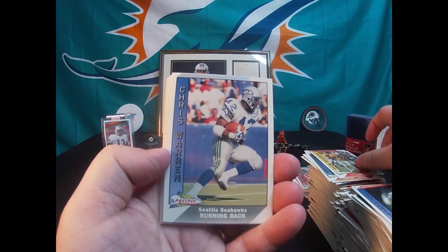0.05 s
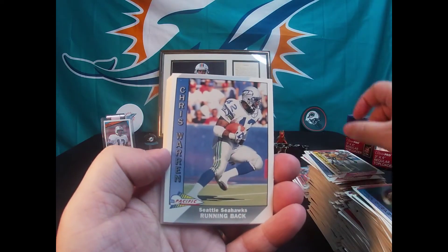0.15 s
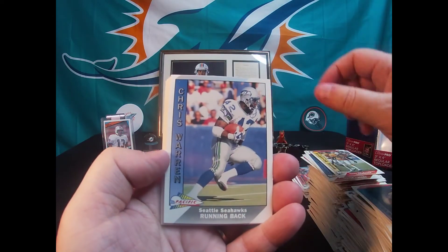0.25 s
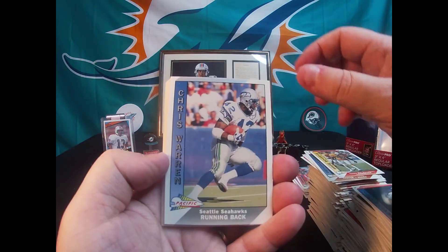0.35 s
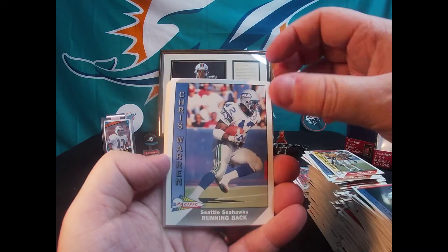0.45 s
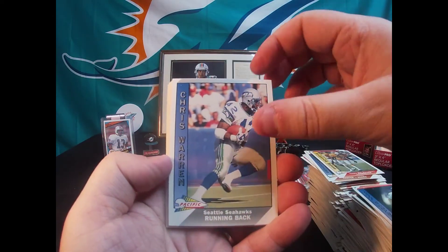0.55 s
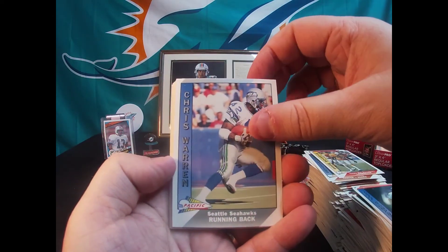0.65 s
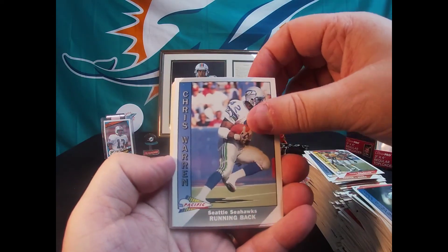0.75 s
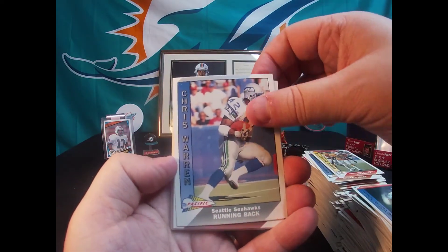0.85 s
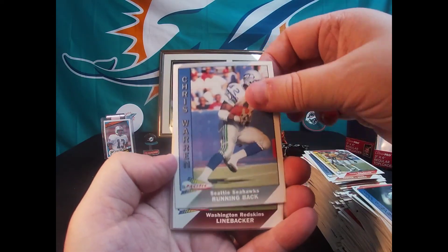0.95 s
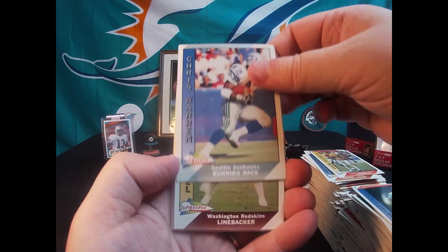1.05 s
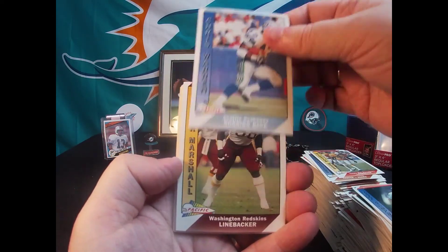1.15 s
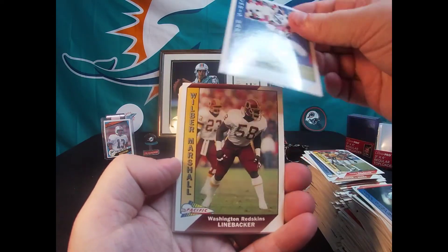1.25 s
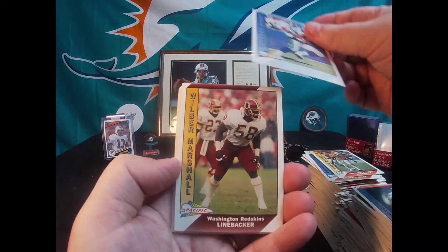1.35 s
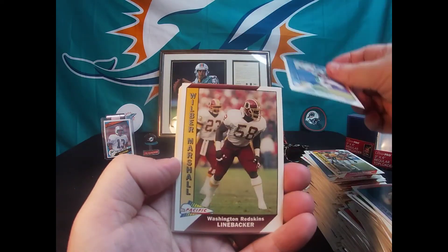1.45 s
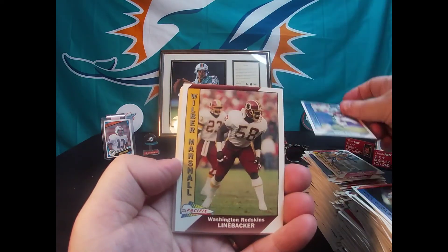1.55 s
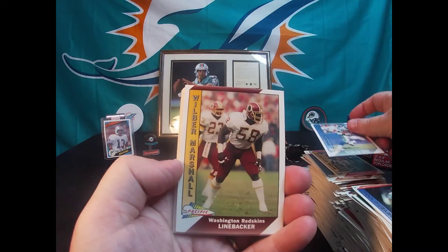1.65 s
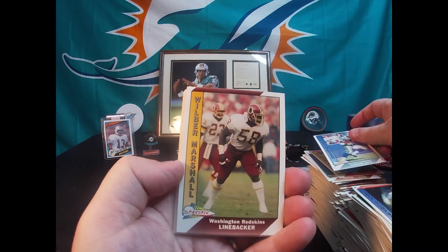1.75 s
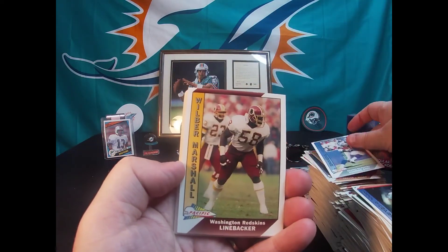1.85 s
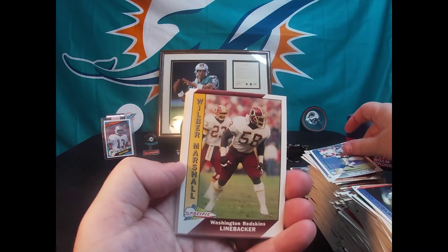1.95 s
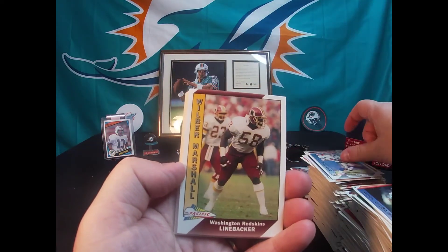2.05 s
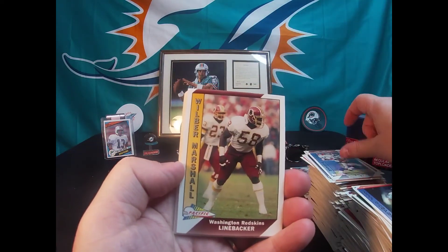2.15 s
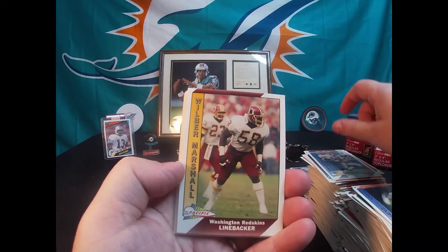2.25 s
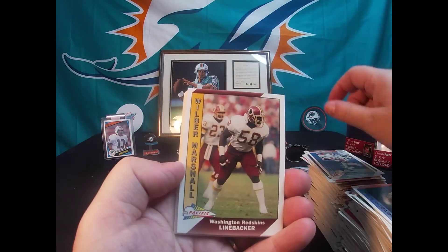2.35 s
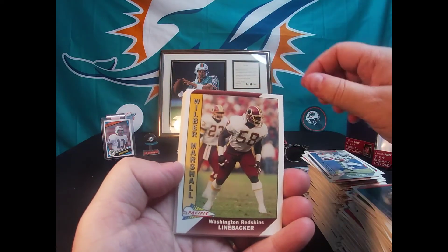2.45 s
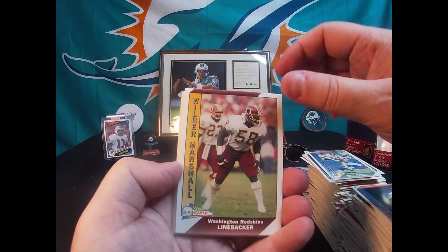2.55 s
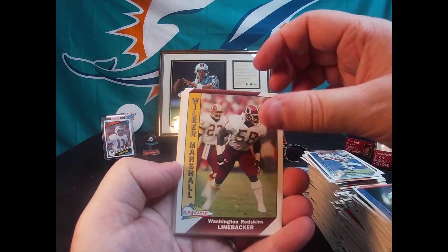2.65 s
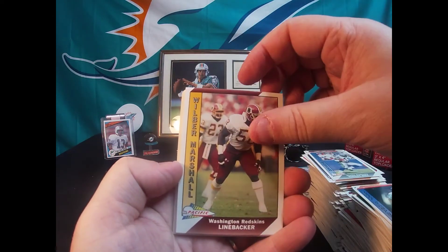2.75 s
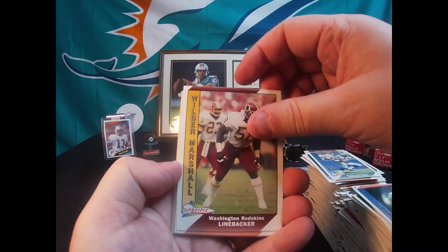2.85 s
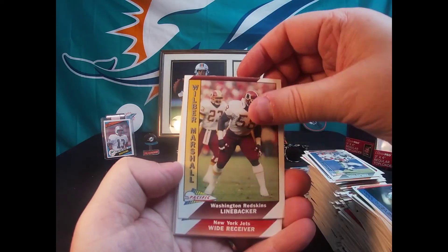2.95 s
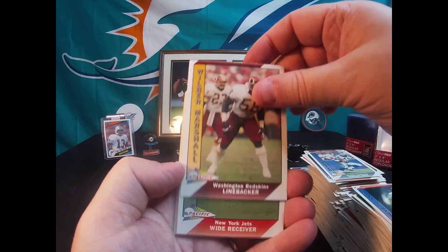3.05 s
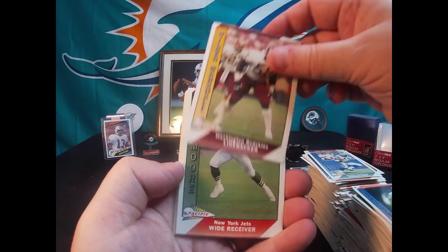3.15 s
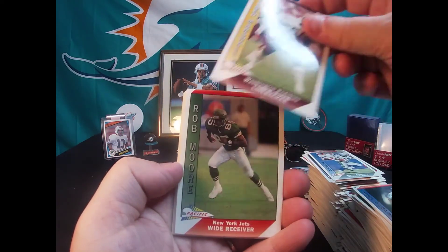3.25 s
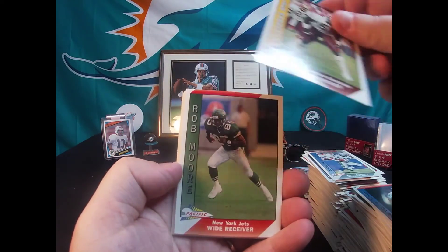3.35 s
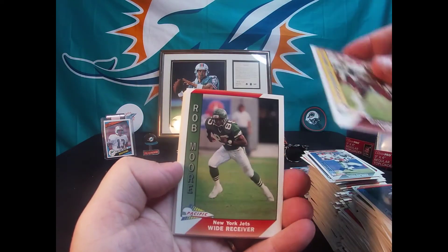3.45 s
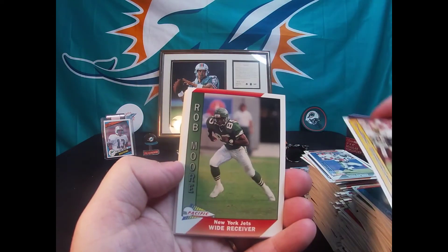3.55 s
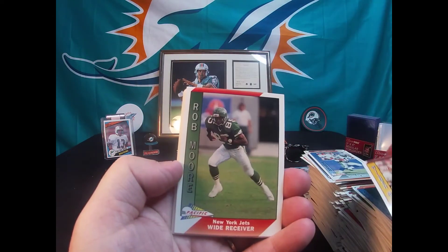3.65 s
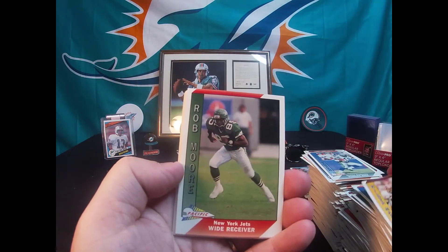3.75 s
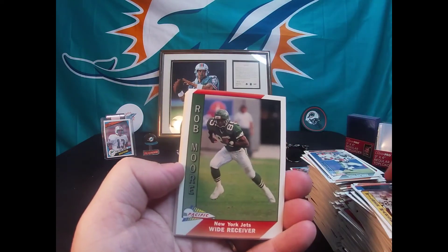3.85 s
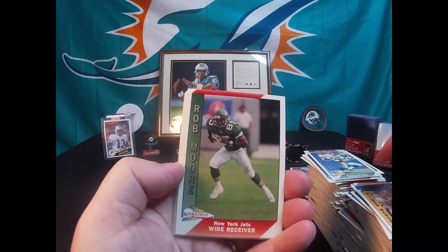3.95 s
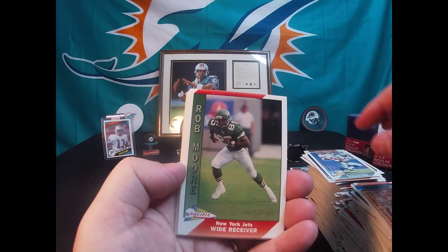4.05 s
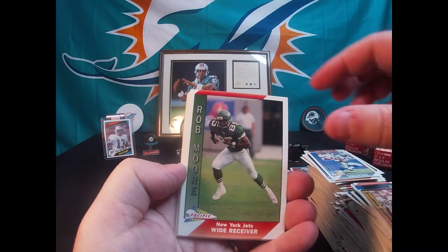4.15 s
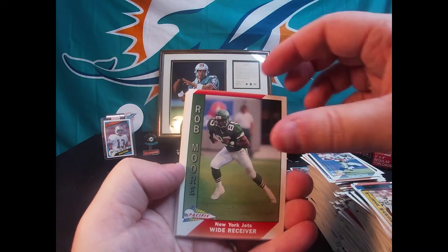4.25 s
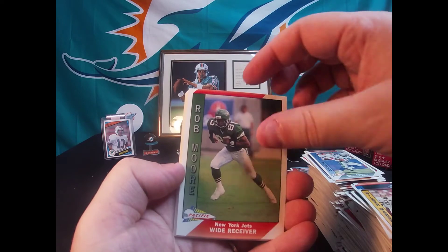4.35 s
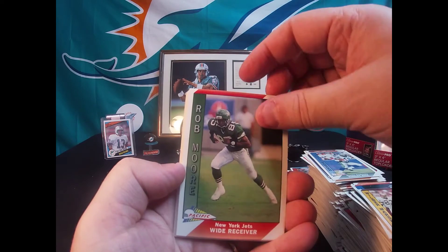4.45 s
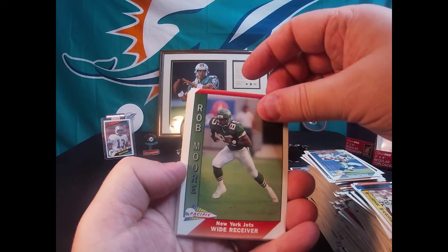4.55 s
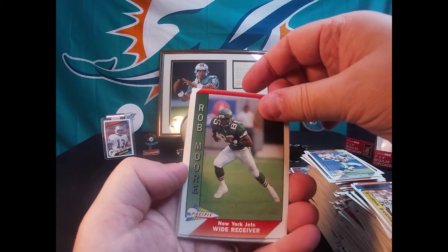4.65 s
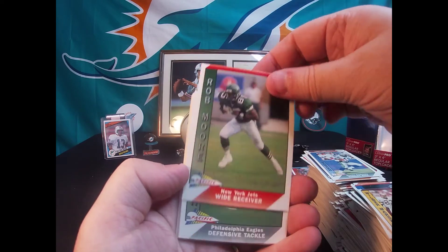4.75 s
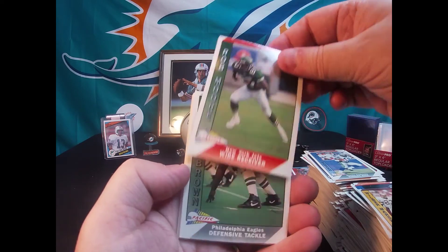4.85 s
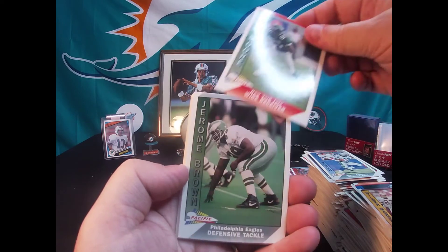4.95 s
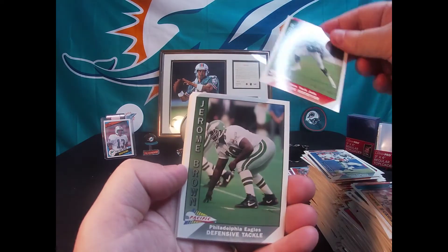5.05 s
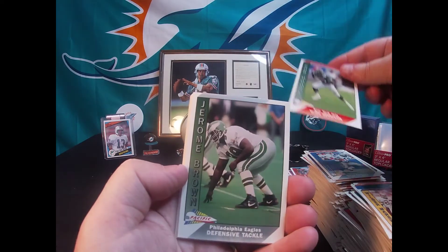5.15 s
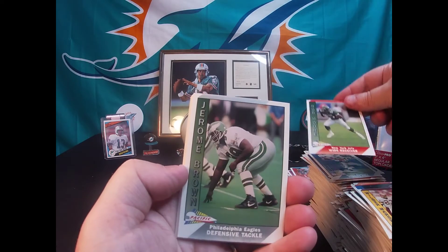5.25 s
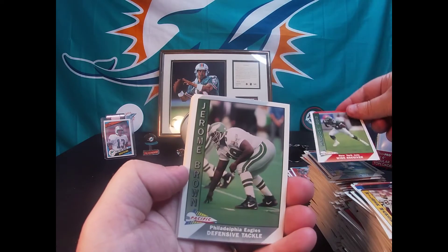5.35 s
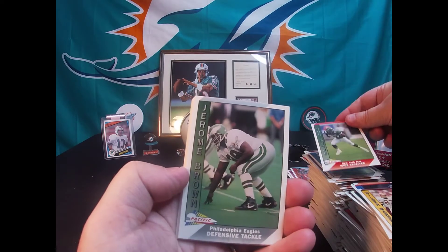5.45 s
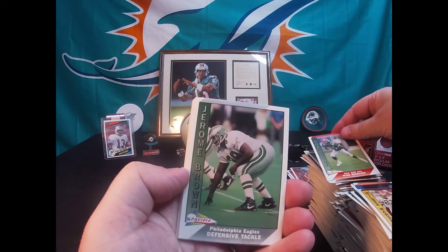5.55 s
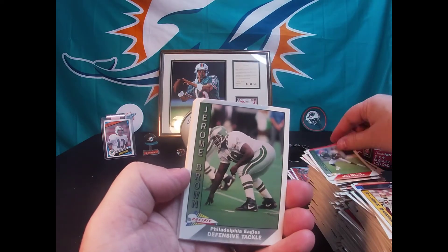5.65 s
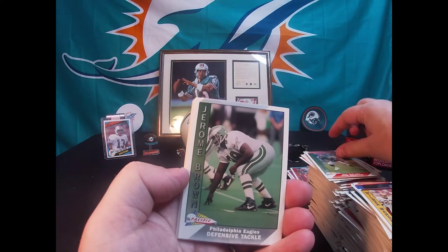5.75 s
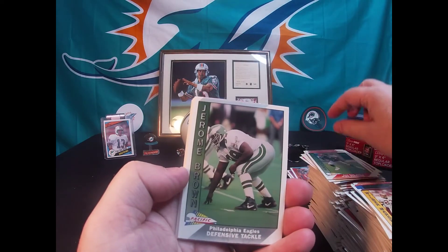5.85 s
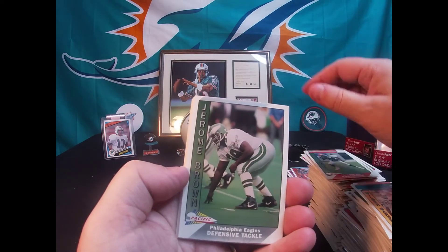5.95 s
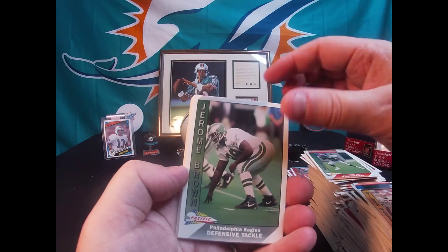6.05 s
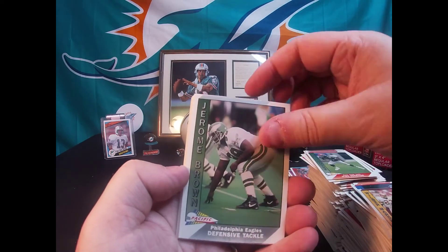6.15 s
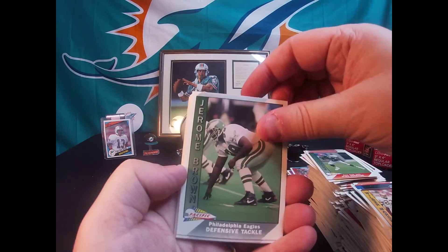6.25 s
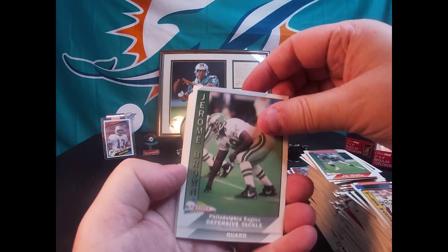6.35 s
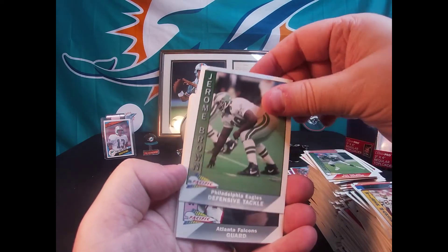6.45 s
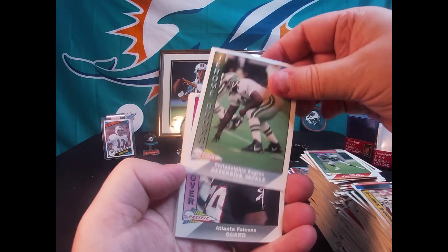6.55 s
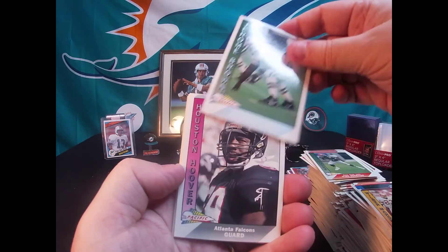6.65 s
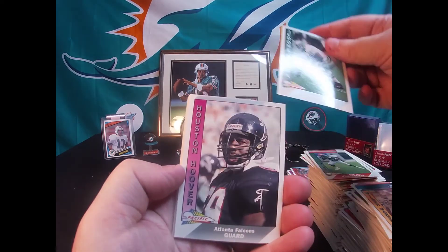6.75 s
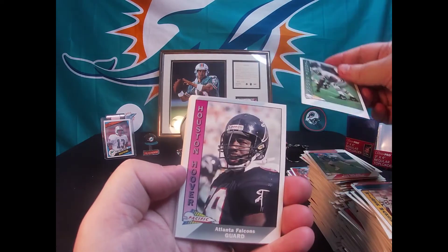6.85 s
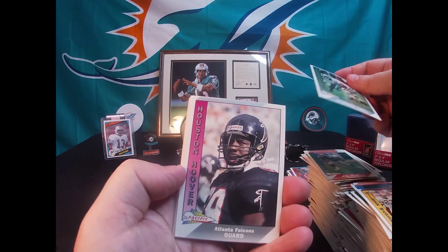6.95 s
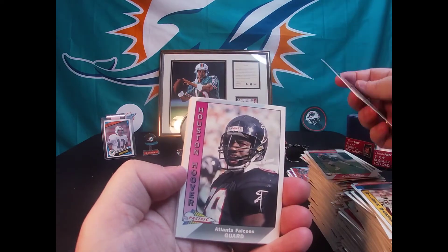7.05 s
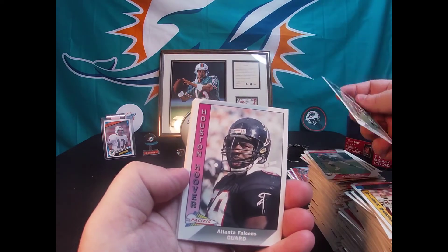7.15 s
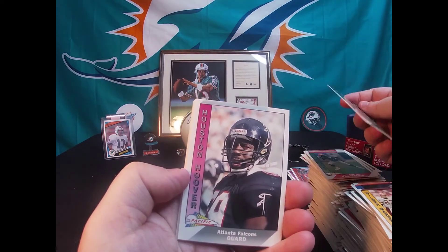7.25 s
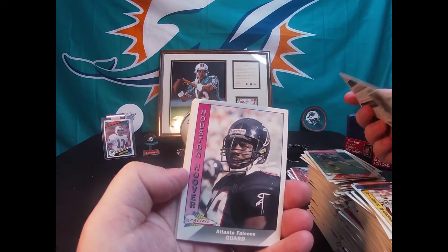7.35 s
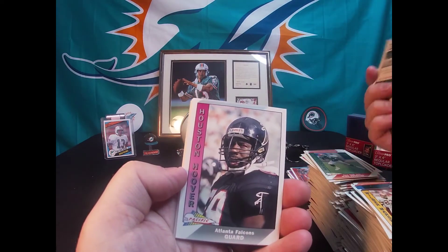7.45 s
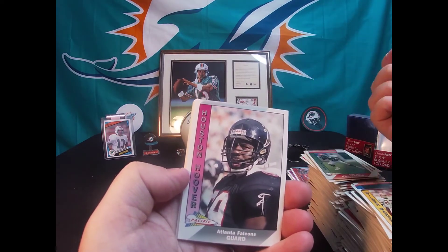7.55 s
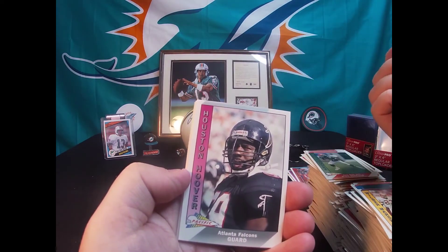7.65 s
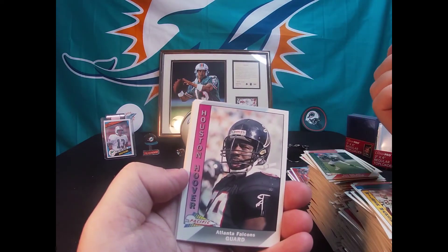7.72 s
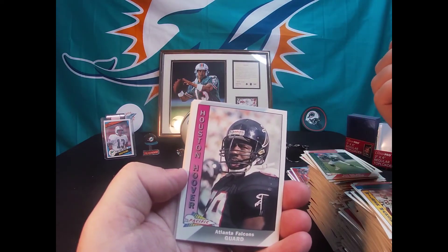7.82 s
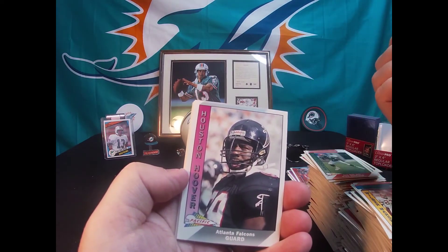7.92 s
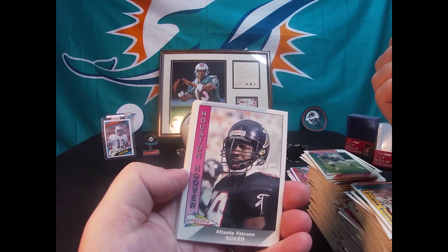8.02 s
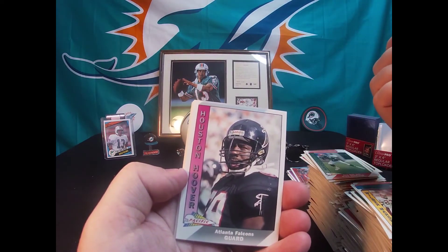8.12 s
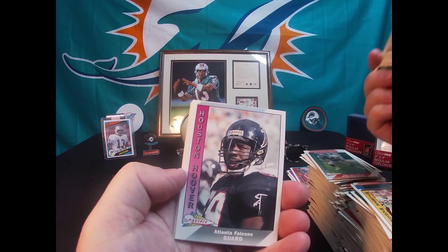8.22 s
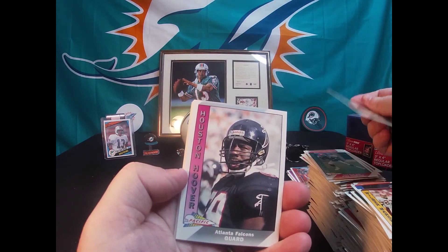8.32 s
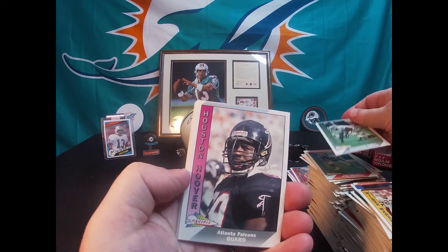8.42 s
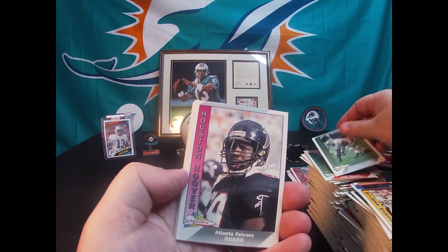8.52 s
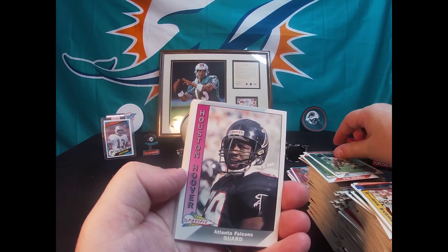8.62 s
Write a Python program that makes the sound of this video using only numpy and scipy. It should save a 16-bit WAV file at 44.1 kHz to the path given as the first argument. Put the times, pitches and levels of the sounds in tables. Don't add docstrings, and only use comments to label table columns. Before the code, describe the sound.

A steady, dull fan hum lies under intimate card handling at a desk. A sharp slap opens, then gritty, swelling slips alternate with snappy landings about every two seconds, the third among the loudest with a strong skim. Light brushes, tiny clicks and cloth rustle come between; the last seconds hold only loose brushing, ticks and a faint thump. Close single microphone, small dry room.

```python
import sys
import numpy as np
from scipy import signal
from scipy.fft import rfft, irfft
from scipy.io import wavfile
from scipy.ndimage import uniform_filter1d

SR = 44100
rng = np.random.default_rng(int(sys.argv[2]) if len(sys.argv) > 2 else 0)


def materialize(psi):
    bounded = np.clip(np.atleast_2d(psi).T, -1, 1)
    quanta = np.round(bounded * 32767).astype(np.int16)
    wavfile.write(sys.argv[1], SR, quanta)


def linear_from_db(decibels):
    return 10 ** (np.asarray(decibels, float) / 20)


N = 382788

# (frequency [Hz], level [dB per Hz])
FAN_AIR = [(41, -35), (70, -10), (98, -11), (123, -10.5), (161, 1), (206, -1.5), (288, -7), (345, -15.5),
           (661, -17), (866, -5.5), (969, -12), (1330, -10), (2270, -23.5), (5970, -25.5), (15000, -40.5)]
# (frequency [Hz], width [Hz], lift over the air noise [dB])
FAN_CASE = [(170, 45, 2), (208.9, 12, 6), (782, 69, 6), (876, 51, -5), (1500, 24, 3)]
# (frequency [Hz], width [Hz], level [dB])
CASE_TONES = [(875, 50, -76), (1500, 34, -83.5)]
# (frequency [Hz], gain [dB])
CAPSULE = [(20, 2.5), (6900, 1.5), (7600, -2), (9000, -0.5), (10000, -7.5), (11000, -16), (14500, -22),
           (16000, -36.5)]
# (time [s], sleeve rustle [dB])
ARM_MOVES = [(0.0, -70), (0.39, -78.5), (0.72, -74.5), (1.5, -78.5), (2.05, -69), (2.83, -77.5),
             (3.29, -59.5), (4.11, -73), (4.83, -69.5), (5.51, -77), (5.92, -63.5), (6.36, -71),
             (7.23, -72.5), (7.71, -68.5), (8.0, -74.5), (8.68, -67)]
# (slap time [s], skim level [dB], skim rise [s], settling level [dB], bend [dB])
LANDINGS = [
    (0.074, -62.5, 0.081, -55, 2),
    (2.115, -58.5, 0.079, -62.5, -1.5),
    (3.904, -51, 0.13, -58, 0.5),
    (5.757, -59, 0.13, -52, -5.5),
]
# (start [s], length [s], first level [dB], last level [dB], bend [dB])
DRAWS = [(0.883, 0.094, -67.5, -73.5, -1.5), (0.997, 0.059, -63.5, -60, 0), (1.042, 0.2, -57.5, -57, -2),
         (1.256, 0.047, -53, -55.5, -0.5), (1.302, 0.14, -65.5, -64, -5), (2.958, 0.099, -68, -60, -1),
         (3.052, .14, -67, -54.5, 0), (3.187, 0.11, -66.5, -50, 2.5), (4.692, 0.13, -75.5, -69, -2.5),
         (5.675, 0.043, -66, -64, -3), (4.792, 0.057, -53.5, -52.5, -1), (4.86, 0.056, -55, -54.5, 2),
         (4.918, 0.049, -54, -43.5, 1.5), (5.019, 0.04, -39, -40.5, -2), (5.057, 0.043, -49, -52.5, 5),
         (6.356, .085, -74.5, -71, 1), (6.45, .11, -51, -72.5, 0.5), (6.547, 0.14, -69, -50.5, 2.5),
         (6.7, .055, -52.5, -60.5, 7), (6.744, 0.072, -53.5, -59.5, 7)]
# (peak time [s], level [dB], rise [s], fall [s], bend [dB])
BRUSHES = [(1.487, -70.5, 0.022, 0.067, -12), (3.378, -63, 0.029, 0.12, 0), (1.361, -68, .03, 0.039, 12),
           (4.985, -72.5, .03, 0.066, 18.5), (4.487, -71, .01, .1, -6.5), (3.445, -67, .06, 0.018, -7),
           (3.479, -55, 0.0056, 0.074, -2.5), (3.515, -63.5, 0.072, 0.033, 6.5),
           (3.585, -60, 0.042, 0.08, -11), (3.701, -71.5, 0.018, 0.2, -9.5), (4.538, -68, .08, .08, -8),
           (5.15, -69, 0.027, 0.082, 2), (5.204, -62.5, 0.011, 0.11, 3), (5.587, -64, .008, 0.12, -3),
           (6.908, -62.5, 0.075, 0.031, 6), (6.988, -74.5, 0.033, 0.049, 9), (7.112, -63, 0.017, 0.13, 0.5),
           (7.392, -71, .012, 0.099, 4), (7.492, -65.5, 0.092, 0.11, -4), (7.537, -60, 0.056, 0.084, 3),
           (8.222, -74, 0.0085, 0.37, 2.5), (8.34, -55, 0.042, 0.1, -4.5), (8.41, -78.5, 0.061, .1, 10),
           (8.661, -60, 0.043, 0.054, 5)]
# (low edge [Hz], high edge [Hz], level [dB], gain per dB of bend [dB])
CARD_RANGES = [(4420, 7170, -0.16, 0), (2510, 4500, -3, 0.58), (7400, 15500, -4.5, -.3),
               (1400, 2640, -6, 1.44), (646, 1320, -14.5, 1.53)]
# (time [s], peak level [dB], centre [Hz], rise and fall [ms], knock of the pile [dB])
SLAPS = [(0.0729, -9, 2870, 1.16, -36.5), (0.0776, -29, 6500, 2.6, -59), (1.289, -30, 5250, 0.52, -41.5),
         (1.3004, -38, 2980, 1.5, -50), (2.116, -24, 4170, 1.8, -32), (2.1217, -34, 2880, 0.82, -38),
         (3.903, -8.5, 2900, 1.84, -18.5), (3.9116, -23, 4390, 0.78, -27), (3.9221, -29, 3780, 1.3, -41),
         (5.005, -16, 5270, 3.3, -51), (5.7568, -14.5, 6360, 0.92, -30), (5.7612, -25, 3250, 1.65, -33.5),
         (8.618, -33, 2700, 1.25, -40), (3.9077, -21, 5380, 0.9, -42)]
# (time [s], peak level [dB], centre [Hz], knock of the pile [dB])
TICKS = [(0.997, -50, 4260, -71), (1.6077, -49, 2030, -96), (1.954, -51, 1500, -53),
         (2.0294, -49, 1500, -59), (2.0614, -44.5, 5100, -54), (2.097, -49, 4270, -67),
         (2.8608, -54, 4800, -58), (3.472, -38, 1970, -46.5), (3.5038, -38, 2250, -46),
         (3.7641, -44.5, 4020, -49), (3.8006, -48, 1510, -71), (3.863, -47, 3160, -58),
         (4.789, -52, 5800, -74), (5.1094, -47, 3310, -44), (5.199, -52, 2680, -70),
         (5.5837, -40, 1970, -62), (5.6707, -48, 5400, -55.5), (6.27, -53, 1500, -62),
         (6.4236, -53, 1500, -74), (6.4476, -46, 6700, -61), (6.8157, -40.5, 5440, -40),
         (6.8564, -41.5, 3750, -65), (6.886, -44, 2240, -53), (6.9006, -38, 2960, -54),
         (7.143, -40, 2540, -67), (7.391, -59, 1840, -68), (7.5194, -45, 5970, -64),
         (7.5436, -37.5, 2750, -60), (7.9995, -50, 5540, -84), (4.031, -55, 7530, -81)]
# (frequency [Hz], level [dB], decay time t60 [s])
PILE_MODES = [(182.4, 3.5, 0.03), (229.4, -10, 0.076), (329.6, -7, .03), (444, -5.5, 0.01),
              (748, 1.5, 0.013), (960, -10, 0.0062), (1430, -9.5, 0.013)]
# (time [s], level [dB])
THUMPS = [
    (0.091, -34),
    (2.13, -33.5),
    (3.917, -33.5),
    (5.777, -33.5),
    (8.63, -47),
]
# (frequency [Hz], level [dB], decay time t60 [s])
DESK_MODES = [(38, -13.5, 0.37), (62, -5, 0.21)]


def unit(x):
    return x / np.sqrt(np.mean(x ** 2))


def band(x, lo_hz, hi_hz, order=2):
    sos = signal.butter(order, [lo_hz, min(hi_hz, 0.45 * SR)], "band", fs=SR, output="sos")
    return signal.sosfilt(sos, x)


def ring(x, modes):
    out = 0
    for hz, db, t60 in modes:
        pole = np.exp(2j * np.pi * hz / SR - np.log(1000) / (t60 * SR))
        out = out + linear_from_db(db) * signal.lfilter([0, pole.imag], [1, -2 * pole.real, abs(pole) ** 2], x)
    return out


def walk(rate_hz):
    hold = int(SR / rate_hz)
    levels = np.repeat(rng.standard_normal(N // hold + 1), hold)
    return 0.78 * uniform_filter1d(uniform_filter1d(levels, hold), hold)[:N]


def curve_db(points):
    hz, db = np.transpose(points)
    bins_hz = np.fft.rfftfreq(N, 1 / SR)
    return np.interp(np.log(np.maximum(bins_hz, 1)), np.log(hz), db)


def fan():
    hz = np.fft.rfftfreq(N, 1 / SR)
    air_db = curve_db(FAN_AIR) - curve_db(CAPSULE).clip(-11, 9)
    for centre, width, lift_db in FAN_CASE:
        air_db = air_db + lift_db * np.exp(-0.5 * ((hz - centre) / width) ** 2)
    passed = (hz > 60) * (hz < 12800)
    air = unit(irfft(rfft(rng.standard_normal(N)) * linear_from_db(air_db) * passed, N))
    tones = 0
    for centre, width, db in CASE_TONES:
        tone = unit(band(rng.standard_normal(N), centre - width / 2, centre + width / 2))
        tones = tones + tone * linear_from_db(db + 5 * walk(9))
    return tones + air * linear_from_db(-65 + 0.7 * walk(1.5) + 0.7 * walk(12))


def arms():
    s, db = np.transpose(ARM_MOVES)
    rustle_db = np.interp(np.arange(N) / SR, s, db)
    rumble = unit(band(rng.standard_normal(N), 6, 58, order=3)) * linear_from_db(-66 + 1.8 * walk(7) + 2.1 * walk(1.4))
    rustle = unit(band(rng.standard_normal(N), 250, 394)) * linear_from_db(rustle_db + 5.2 * walk(14))
    return rumble + rustle


def slips(scatter_db, catch_db):
    return linear_from_db(scatter_db * rng.exponential(size=N) + catch_db * (walk(60) + walk(250)))


CONTROL_STEP = 16


def contact(start_s, end_s, first_db, last_db, rise_db_per_s, fall_db_per_s):
    t = np.arange(0, N, CONTROL_STEP) / SR
    held_db = np.interp(t, [start_s, end_s + 1e-6], [first_db, last_db])
    swell_db = rise_db_per_s * (start_s - t).clip(0)
    fade_db = fall_db_per_s * (t - end_s).clip(0)
    return linear_from_db(2 * (held_db - swell_db - fade_db))


def card_touches():
    draw_gloss_db, brush_gloss_db, landing_gloss_db = 5.5, 1, -1
    skim_end_s, settle_after_s, settle_rise_s, settle_fall_s = 0.012, 0.029, 0.0522, 0.089
    brushes = [(*row, brush_gloss_db) for row in BRUSHES]
    for s, skim_db, rise, settle_db, bend in LANDINGS:
        brushes.append((s - skim_end_s / 2, skim_db, rise, skim_end_s, bend, landing_gloss_db))
        brushes.append((s + settle_after_s, settle_db, settle_rise_s, settle_fall_s, bend, landing_gloss_db))
    touches = []
    for s, length, first, last, bend in DRAWS:
        touches.append((contact(s, s + length, first, last, 1400, 1000), bend, draw_gloss_db))
    for s, db, rise, fall, bend, gloss in brushes:
        touches.append((contact(s, s, db, db, 20 / rise, 20 / fall), bend, gloss))
    return [np.array(column) for column in zip(*touches)]


def slides():
    power, bend_db, gloss_db = card_touches()
    jolts = slips(2.3, 1.6)
    out = 0
    for lo, hi, db, db_per_bend in CARD_RANGES:
        if lo < 2400:
            jolts = jolts * linear_from_db(2.5 * walk(140))
        edges = np.geomspace(lo, hi, 3)
        modes = 0
        for a, b in zip(edges, edges[1:]):
            modes = modes + band(jolts * rng.standard_normal(N), a, b) * linear_from_db(2.2 * walk(25))
        is_surface_hiss = lo > 7300
        touch_db = db + db_per_bend * bend_db + gloss_db * is_surface_hiss
        gain = np.sqrt(linear_from_db(2 * touch_db) @ power)
        out = out + unit(modes) * np.repeat(gain, CONTROL_STEP)[:N]
    return out


def edge_events():
    dull_per_knock_db, tick_ms = 0.86, 1.5
    events = []
    for s, db, hz, ms, knock_db in SLAPS:
        events.append((s, db, hz, ms, knock_db, -26 + dull_per_knock_db * (db - knock_db)))
    for s, db, hz, knock_db in TICKS:
        events.append((s, db, hz, tick_ms, knock_db, -35 + dull_per_knock_db * (db - knock_db)))
    return events


def snaps():
    cracks, blows = np.zeros(N + 2048), np.zeros(N + 2048)
    t = np.arange(1024) / SR - 0.005
    for s, db, hz, ms, knock_db, bright_db in edge_events():
        hiss, fizz, push = rng.standard_normal((3, 1024))
        i = int((s + t[0]) * SR)
        late = t / max(ms, 0.3) * 1000 - 1.3
        top = np.exp(-1.3 * np.abs(late) ** 1.7)
        flutter = 0.27 * np.exp(np.where(late < 0, late / 1.8, -late / 4.4))
        tone = unit(band(hiss, hz / 1.25, hz * 1.16, order=1)) + 0.8 * unit(band(hiss, 720, 7220))
        bright = linear_from_db(bright_db + 7.5) * unit(band(fizz, 10000, 15000))
        burst = (top + flutter) * (tone + bright)
        cracks[i:i + 1024] += linear_from_db(db - 1.0) * burst / np.abs(burst).max()
        soft = np.clip(t, 0, 1) / 0.004
        blows[i:i + 1024] += linear_from_db(knock_db - 19.5) * (push + 0.26) * soft * np.exp(-soft)
    cracks = cracks + 0.14 * np.roll(cracks, int(0.001 * SR))
    return cracks[:N] + ring(band(blows[:N], 190, 1500), PILE_MODES)


def room(x):
    near_db, near_t60_s = -23, 0.055
    wall_db, wall_s, wall_t60_s = -19.5, 0.032, 0.2
    t = np.arange(SR // 2) / SR
    early = linear_from_db(near_db - 60 * t / near_t60_s) * np.clip(t / 0.023, 0, 1)
    late = linear_from_db(wall_db - 60 * (t - wall_s) / wall_t60_s) * np.clip((t - wall_s) / 0.00459, 0, 1)
    echoes = (early + late) * rng.standard_normal(len(t)) / np.sqrt(SR / 100)
    return signal.fftconvolve(x, echoes)[:N]


def desk_thumps():
    blows = np.zeros(N)
    for s, db in THUMPS:
        blows[int(s * SR)] = linear_from_db(db)
    return ring(blows, DESK_MODES) / (2 * np.pi * 50 / SR) * 0.0068


def scene():
    cards = snaps() + slides()
    mono = cards + room(cards) + desk_thumps() + arms() + fan()
    return np.array([mono, mono])


def low_pass(x):
    return signal.sosfilt(signal.butter(12, 15990, fs=SR, output="sos"), x)


def record(dry):
    heard = irfft(rfft(dry) * linear_from_db(curve_db(CAPSULE)), N)
    hiss = linear_from_db(-99) * unit(band(rng.standard_normal(N), 10626, 14000, order=4))
    return low_pass(heard + hiss * np.array([[1], [-1]]))


dry = scene()
out = record(dry)
materialize(out)
```